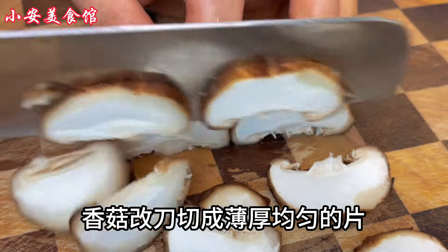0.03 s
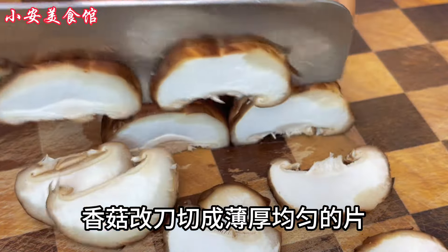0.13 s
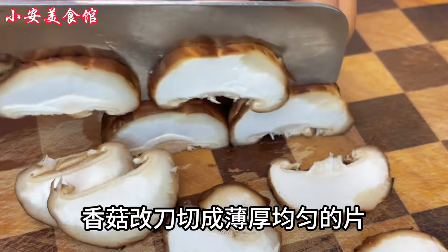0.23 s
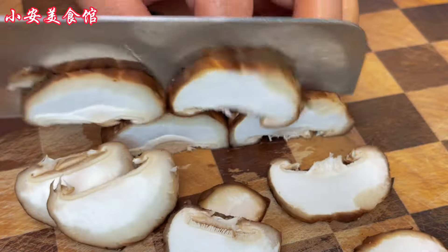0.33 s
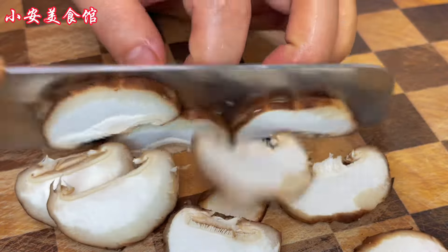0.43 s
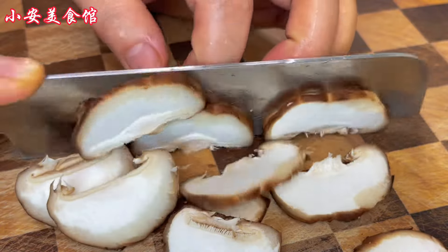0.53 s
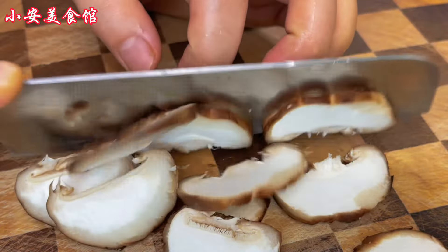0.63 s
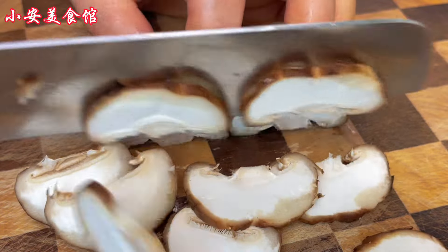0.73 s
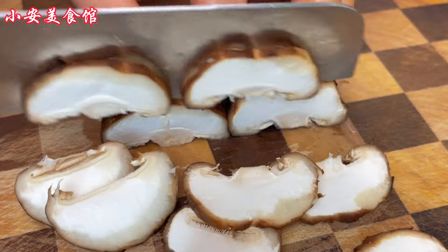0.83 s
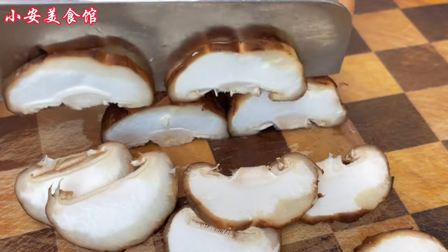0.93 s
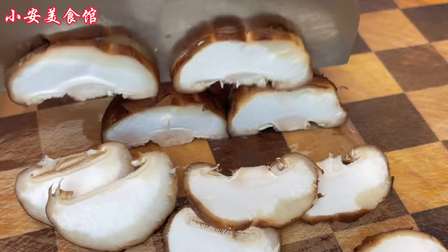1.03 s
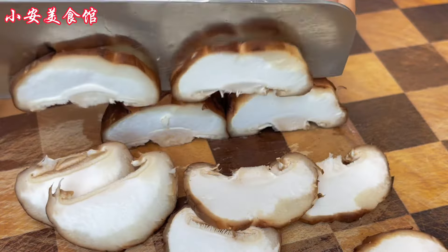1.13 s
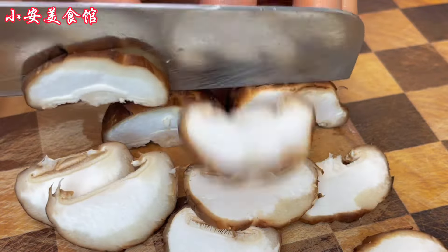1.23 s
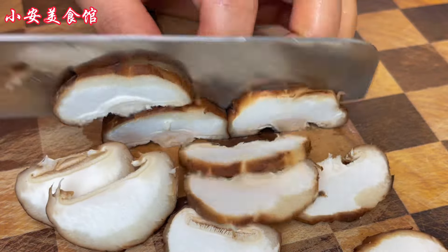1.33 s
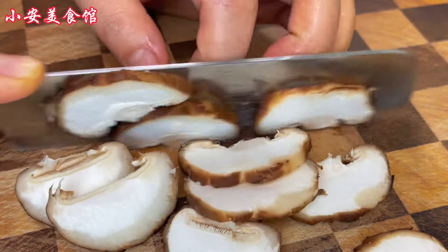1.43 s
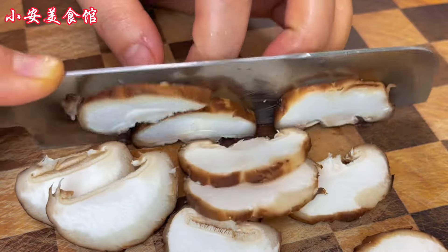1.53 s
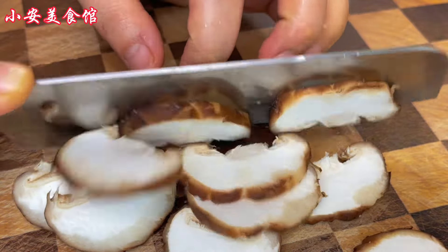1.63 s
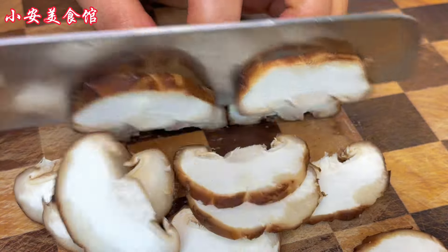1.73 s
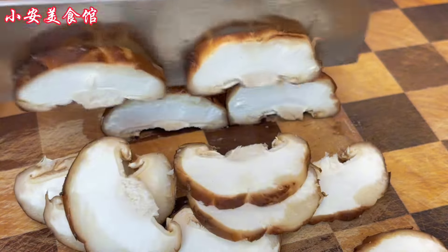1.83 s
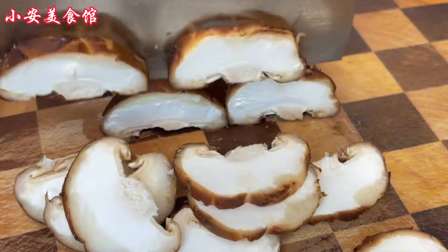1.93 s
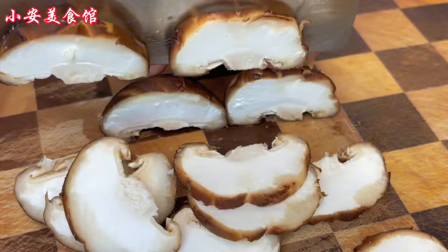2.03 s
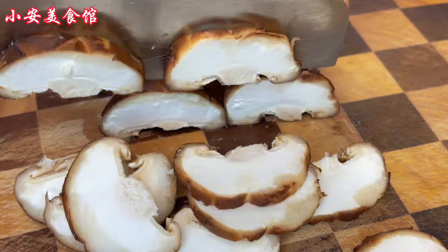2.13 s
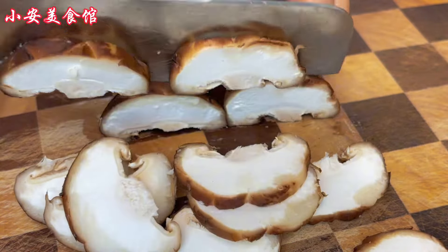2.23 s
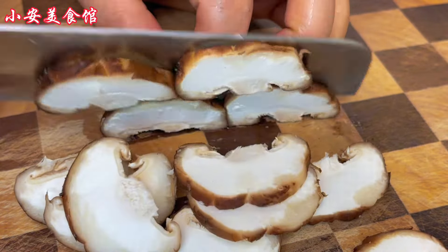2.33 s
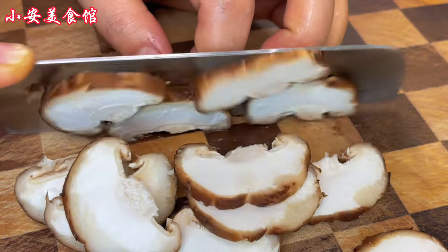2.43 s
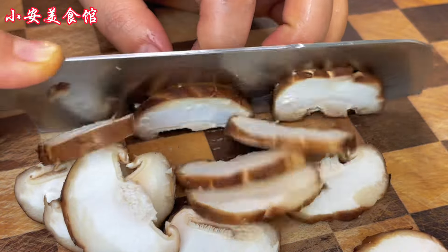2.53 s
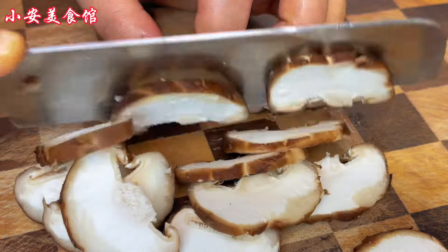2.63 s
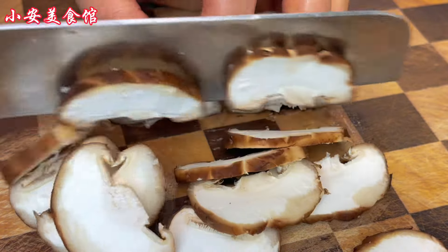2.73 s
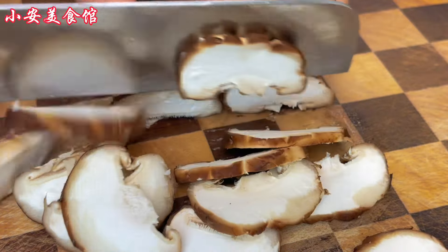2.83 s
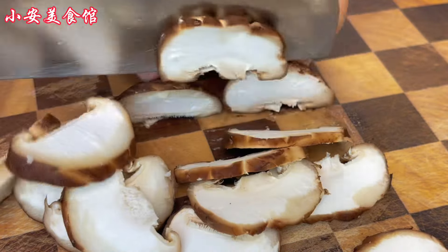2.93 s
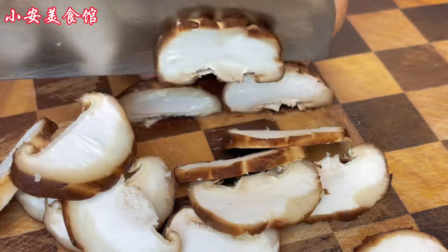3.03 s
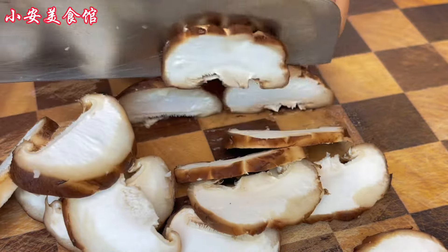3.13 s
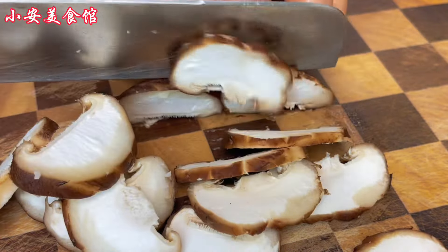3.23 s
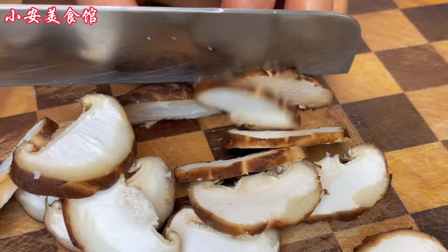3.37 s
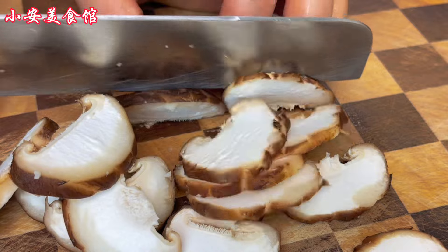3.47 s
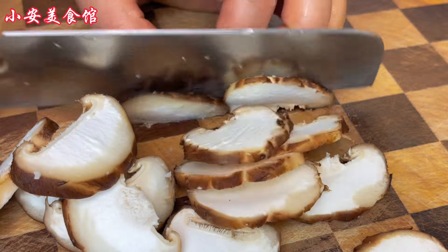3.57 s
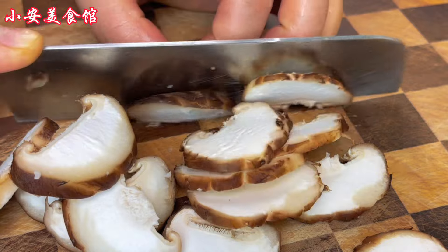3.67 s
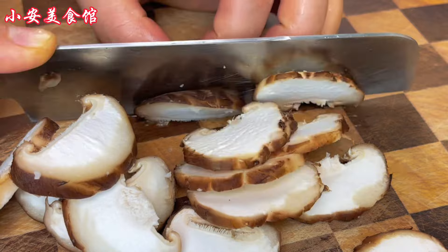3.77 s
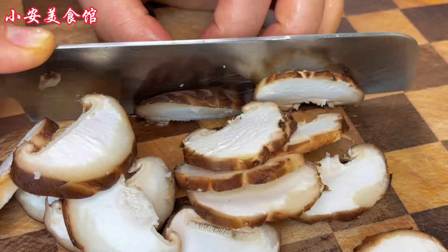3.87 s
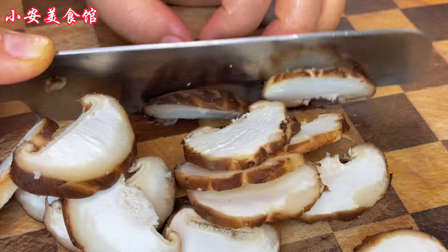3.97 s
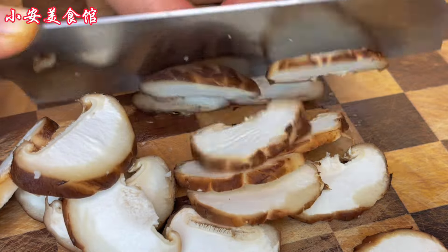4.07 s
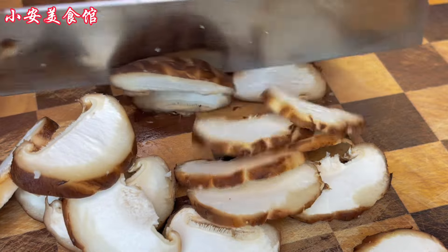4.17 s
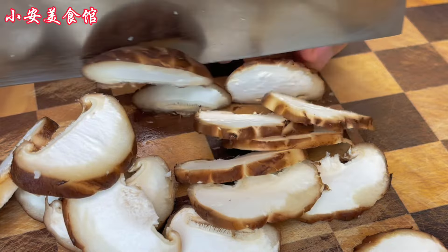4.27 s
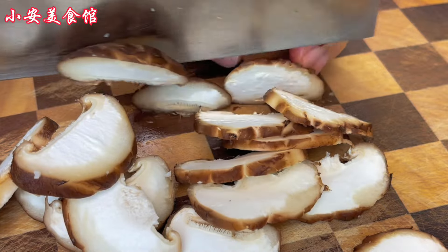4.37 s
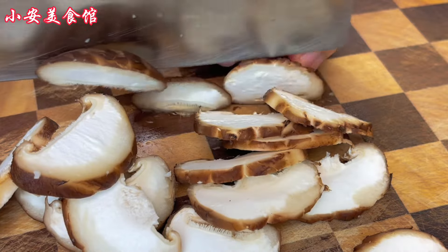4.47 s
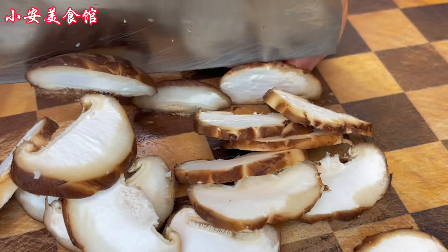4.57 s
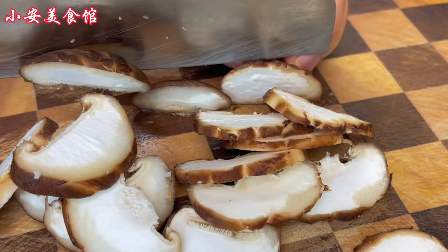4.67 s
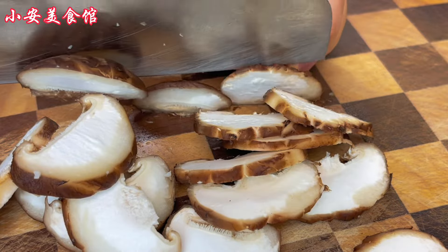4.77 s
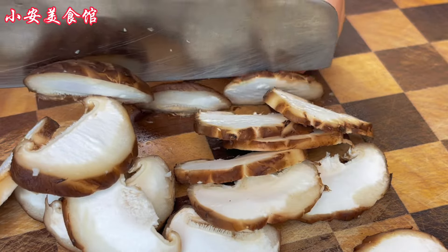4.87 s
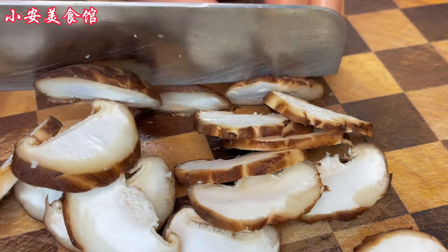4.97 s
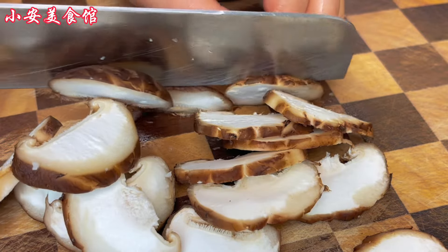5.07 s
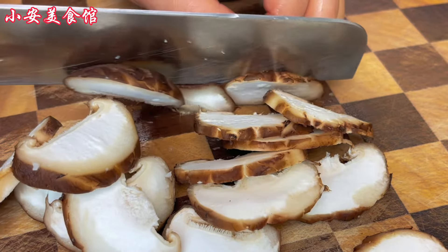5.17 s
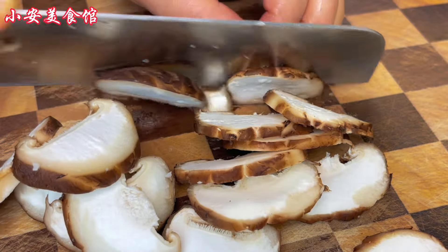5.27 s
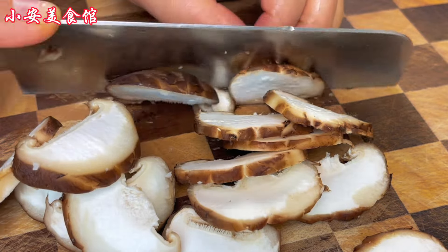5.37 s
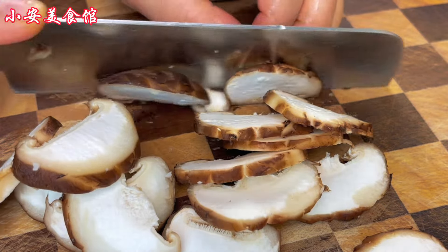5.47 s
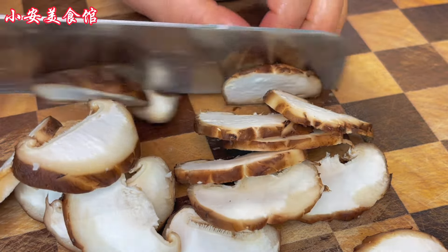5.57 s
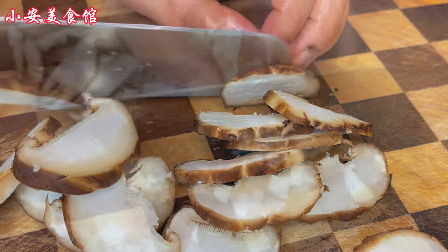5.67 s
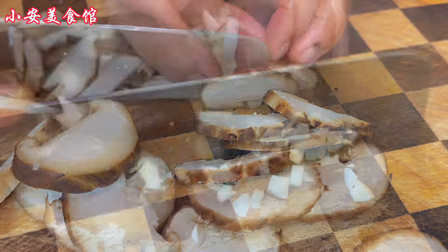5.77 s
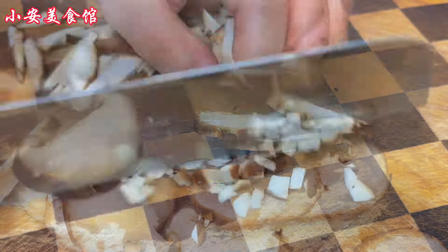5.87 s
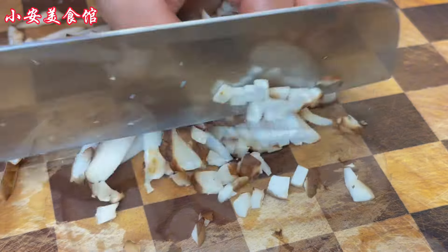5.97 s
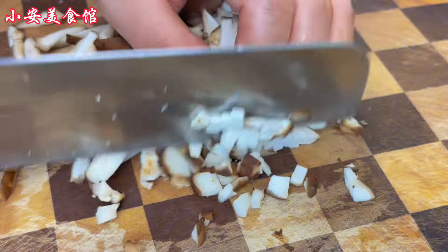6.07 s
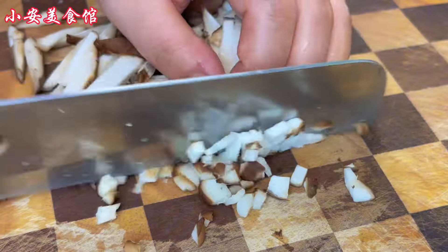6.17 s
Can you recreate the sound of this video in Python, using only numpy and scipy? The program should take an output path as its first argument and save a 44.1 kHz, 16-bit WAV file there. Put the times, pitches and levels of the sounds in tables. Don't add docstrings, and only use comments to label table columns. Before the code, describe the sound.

In a small home kitchen, heard very close, a cleaver slices mushrooms on a thick wooden board. Each stroke crunches through damp flesh and ends in a loud, short woody knock, then a wet drag. Slices pat down softly between strokes, the blade ticks and briefly rings, the counter thuds low, and a fan blows steadily underneath.

```python
import sys
import numpy as np
from scipy import signal
from scipy.fft import rfft, irfft, next_fast_len
from scipy.io import wavfile
from scipy.ndimage import uniform_filter1d

SR = 44100
rng = np.random.default_rng(int(sys.argv[2]) if len(sys.argv) > 2 else 0)


def attenuation_scalar(level_db):
    decades = np.asarray(level_db, float) / 20
    return 10 ** decades


def file_out(sig):
    cols = np.atleast_2d(sig).T
    lim = np.clip(cols, -1, 1)
    pcm = np.round(lim * 32767).astype(np.int16)
    wavfile.write(sys.argv[1], SR, pcm)


N = 273420

# start_s, peak_db, low_modes_db, high_modes_db, clap_hz
LANDINGS = [(.001, -18.5, -3, 2, 894), (.0222, -16, -12.5, -3.5, 900), (.471, -10, 2, -15, 554),
            (0.4757, 1.5, -3.5, -6, 692), (0.644, -31, 9, -3, 443), (1.037, -32, 7, 9, 345),
            (1.431, -3.5, -12, -16, 470), (1.435, -1, -4, 25, 700), (2.419, -9, -22, 9, 450),
            (2.4265, 0.5, 4.5, 7.5, 582), (3.631, -6, 4, -18, 500), (3.638, -2, 0.5, 0, 600),
            (3.68, -17, -19, 2, 453), (3.963, -31, -12, -2, 400), (5.339, -13.5, -9, -33, 487),
            (5.3463, 0.5, -2.5, -15.5, 619), (5.612, -18, -4, -9, 860), (5.623, 0.5, 9, 3.5, 560),
            (5.802, -18.5, 12, -11, 376), (6.138, -13, 10, -10, 500), (6.161, 1, 3.5, -8, 604),
            (1.459, -19, -5, 7, 500), (2.436, -17, -9, -8, 360), (5.387, -43, 5, -1, 450),
            (5.665, -21, 10, -5, 437), (5.674, -31, 0, -5, 420), (5.689, -24, 4, -8, 460),
            (1.4321, -7, 8, -14, 413), (5.3502, -6, 6, -13, 450), (5.3565, -12, 4, -7, 533),
            (1.4507, -21, -2, -6, 406), (3.6423, 1, -17, -4, 485), (3.6335, -5, -5, -14, 513),
            (5.751, -16, 4, -16, 386), (5.757, -28, -12, 2, 360), (5.632, -13.5, -2.5, -9, 380),
            (2.468, -22, -7, -5, 420), (5.362, -15, -5, -13, 370), (5.384, -21, -4, -9, 450),
            (2.448, -21.5, -6, -12, 350)]
# mode_hz, level_db, t60_s
BLADE_MODES = [(1846, -9, 0.22), (2200, -14, .25), (2900, -4.5, 0.17), (3460, -5, 0.18),
               (3626, -12.5, 0.35), (4750, -3, 0.11), (5700, -3, 0.079), (5850, -11, 0.19),
               (6620, -20, 0.071), (7240, -5, .1), (7830, -4.5, 0.1), (8770, -5, 0.28), (9660, -6, .07),
               (10520, -3, .12), (12160, 7, .1)]
SWAY_HZ = 46.4


def rms_one(x):
    return x / np.sqrt(np.mean(x ** 2) + 1e-20)


def at_hz(points, hz):
    points = np.array(points)
    return np.interp(np.log(hz), np.log(points[:, 0]), points[:, 1])


def band(x, order, hz, kind="low"):
    return signal.sosfilt(signal.butter(order, hz, kind, fs=SR, output="sos"), x)


def drift(rate_hz):
    r = np.exp(-80 * np.pi * rate_hz / SR)
    slow = signal.lfilter([1], [1, -2 * r, r * r], rng.standard_normal(N // 40 + 2002))[2000:]
    return np.interp(np.arange(N) / 40, np.arange(len(slow)), rms_one(slow))


def ring(drive, hz, t60_s):
    r = attenuation_scalar(-60 / (t60_s * SR))
    w = 2 * np.pi * hz / SR
    return signal.lfilter([0, np.sin(w)], [1, -2 * r * np.cos(w), r * r], drive + 1e-18)


def ring_s(width_hz):
    return np.log(1000) / np.pi / width_hz


def colour(x, spectrum):
    hz = np.maximum(np.fft.rfftfreq(N, 1 / SR), 1)
    ends = [(spectrum[0][0] / 2, -90)] + list(spectrum) + [(spectrum[-1][0] * 2, -120)]
    return rms_one(irfft(rfft(x) * attenuation_scalar(at_hz(ends, hz)), N))


def grains(per_s, spread_db):
    sizes = attenuation_scalar(spread_db * np.minimum(rng.exponential(1, N), 4)) * rng.choice([-1, 1], N)
    return sizes * (rng.random(N) < per_s / SR)


def streaky(x, depth_db):
    cells = signal.stft(x, nperseg=512)[2]
    field = rng.standard_normal(cells.shape)
    for _ in range(2):
        field = uniform_filter1d(field, size=3, axis=0)
        field = uniform_filter1d(field, size=6, axis=1)
    return rms_one(signal.istft(cells * attenuation_scalar(depth_db * rms_one(field)), nperseg=512)[1][:N])


def swell(start_s, end_s, start_db, end_db, rise_s, fall_s):
    t = np.arange(N) / SR
    done = np.clip((t - start_s) / max(end_s - start_s, 1e-4), 0, 1)
    outside = np.maximum(start_s - t, 0) / rise_s + np.maximum(t - end_s, 0) / fall_s
    return attenuation_scalar(start_db + (end_db - start_db) * done - 30 * outside)


def hump(s, half_s, level_db):
    return attenuation_scalar(level_db) * np.exp(-((np.arange(N) / SR - s) / half_s) ** 2)


def add(track, s, sound):
    i = round(s * SR)
    track[i:i + len(sound)] += sound[:N - i]


def fan(patchy_db):
    # freq_hz, level_db_per_hz
    air = [(30, -29), (60, -6), (95, 9), (192, 0), (406, -5.5), (724, -11), (1400, -16), (1900, -14),
           (2480, -70), (3650, -83), (6050, -32.5), (9300, -68), (13000, -34.5)]
    # mode_hz, width_hz, level_db
    duct_modes = [(110, 25, -75), (249.7, 8.1, -43), (560, 29, -53.5), (1015, 67, -52), (1110, 17, -61),
                  (1836, 35, -61.5)]
    # time_s, level_db
    loudness = [(0.0, -46), (1.31, -41), (1.48, -30.5), (1.64, -41.5), (2.19, -41), (2.45, -41.5),
                (3.45, -44), (3.76, -40), (4.52, -43.5), (4.73, -45), (5.33, -51), (5.53, -40.5),
                (6.2, -39)]
    # freq_hz, likeness (1 = same)
    likeness = [(60, 0.97), (250, 0.92), (560, 0.69), (1000, 0.14), (1500, 0.27), (2000, 0.31)]
    out = 0
    edges_hz = 30 * 2 ** np.arange(0, 9.1, .5)
    white = rng.standard_normal((2, 2, N))
    for k, (low_hz, high_hz) in enumerate(zip(edges_hz, edges_hz[1:])):
        mid, side = band(white[k % 2], 2, [low_hz, high_hz], "band")
        hz = np.sqrt(low_hz * high_hz)
        alike = at_hz(likeness, hz)
        gain = attenuation_scalar(at_hz(air, hz) + patchy_db * drift(15.5))
        out = out + gain * (np.sqrt(1 + alike) * mid + np.sqrt(1 - alike) * side * [[1], [-1]])
    duct = white[0] + 2.13 * white[1, 0]
    tones = 0
    for hz, width_hz, tone_db in duct_modes:
        tones = tones + attenuation_scalar(tone_db + 41 + 1.53 * drift(9.2)) * rms_one(ring(duct, hz, ring_s(width_hz)))
    time_s, level_db = np.transpose(loudness)
    level = attenuation_scalar(np.interp(np.arange(N) / SR, time_s, level_db))
    return level * (attenuation_scalar(5.0) * rms_one(out) + tones)


def cutting():
    # freq_hz, level_db_per_hz
    flesh_spectrum = [(290, -53), (500, -34), (587, -7), (780, -14), (1170, -4.5), (1480, -4), (1680, -4),
                      (2920, -2.5), (4200, -33), (5460, -69), (9240, -120)]
    # freq_hz, level_db_per_hz
    rub_spectrum = [(3000, -1.5), (3600, -8), (4040, -10.5), (4510, -6), (7670, -10), (8640, -7),
                    (9300, -8), (12400, -15.5), (16000, -8)]
    # start_s, lift_s, start_db, lift_db, rub_over_crunch_db
    drags = [(0, 0.19, -30.5, -56.5, -2.5), (0.492, 0.55, -36, -36.5, -5), (1.453, 1.516, -42.5, -37, -2),
             (2.428, 2.541, -34, -33, -4), (2.594, 2.846, -53, -80, 5), (3.666, 3.766, -40, -39.5, -10.5),
             (5.347, 5.42, -37, -47.5, -3), (5.652, 5.767, -31, -35.5, -2.5),
             (5.79, 6.05, -44.5, -55.5, -7), (6.153, 6.201, -46, -32, 3)]
    # bite_s, landing_s, bite_crunch_db, landing_crunch_db, rub_over_crunch_db
    pushes = [(0.276, 0.445, -57.5, -27.5, -1), (1.338, 1.415, -32, -27.5, -3.5),
              (1.298, 1.33, -39.5, -47.5, 0), (2.296, 2.4, -41, -31, 0), (3.218, 3.582, -58.5, -41, 0.5),
              (3.603, 3.622, -41.5, -28, -2.5), (5.015, 5.124, -50.5, -49.5, -1),
              (5.132, 5.351, -55.5, -38.5, 0), (5.481, 5.628, -52.5, -29.5, 0.5),
              (6.069, 6.117, -63.5, -59, 13)]
    # landing_s, crunch_db, rub_over_crunch_db
    bursts = [(0.468, -21, -10.5), (1.427, -21, -7), (2.418, -24, -2), (3.633, -21, -30),
              (5.618, -35.5, 7.5), (6.146, -26.5, -0.5)]
    # start_s, crunch_db, rub_over_crunch_db
    brushes = [(0.648, -46, -0.5), (.836, -47.5, -22.5), (0.929, -48, -10), (1.043, -50, -0.5),
               (1.16, -69.5, 20), (1.613, -42.5, -2.5), (1.885, -54, -17.5), (1.992, -54, 11),
               (2.123, -52.5, -3), (2.963, -60.5, 9), (3.98, -37.5, -5.5)]
    bite_s, lift_s, burst_rise_s, burst_fall_s, brush_rise_s, brush_fall_s = 0.021, 0.045, 0.022, 0.049, 0.034, 0.089
    rest_crunch_db, rest_rub_db = -60.5, -65
    moves = [(swell(*run, bite_s, burst_fall_s), wet_db) for *run, wet_db in pushes]
    moves += [(swell(s, s, db, db, burst_rise_s, burst_fall_s), wet_db) for s, db, wet_db in bursts]
    moves += [(swell(*run, bite_s, lift_s), wet_db) for *run, wet_db in drags]
    moves += [(swell(s, s, db, db, brush_rise_s, brush_fall_s), wet_db) for s, db, wet_db in brushes]
    flesh = np.sqrt(attenuation_scalar(rest_crunch_db) ** 2 + sum(gain ** 2 for gain, _ in moves))
    steel = np.sqrt(attenuation_scalar(rest_rub_db) ** 2 + sum((gain * attenuation_scalar(wet_db)) ** 2 for gain, wet_db in moves))
    cells = grains(4000, spread_db=3.5) * attenuation_scalar(1.5 * drift(60))
    crunch = streaky(colour(cells, flesh_spectrum), depth_db=1.6)
    slips = grains(9000, spread_db=1.5) * attenuation_scalar(1.1 * drift(56))
    rub = streaky(colour(slips, rub_spectrum), depth_db=1.7)
    return flesh * crunch + steel * rub


def squeaks():
    # start_s, end_s, pitch_hz, start_db, end_db
    held = [(0, 0.18, 183, -28.5, -34.5), (0, .07, 870, -24.5, -40), (0, 0.055, 2300, -33, -42),
            (.07, 0.18, 2240, -37.5, -50), (0, .15, 2700, -41, -47), (0, .13, 7620, -40.5, -50.5),
            (1.41, 1.425, 1320, -28, -20), (2.465, 2.54, 2400, -44, -38), (3.692, 3.92, 444, -27.5, -41),
            (3.66, 3.82, 1800, -35, -48), (5.655, 5.74, 383, -23, -29), (5.5, 5.61, 1930, -43, -37.5),
            (1.037, 1.062, 350, -22, -33.5), (4.2, 4.63, 561, -49.5, -44), (4.25, 4.7, 1030, -49, -52.5),
            (2.75, 3.0, 524, -46, -49)]
    out = np.zeros(N)
    noise = rng.standard_normal((len(held), SR // 2))
    for (start_s, end_s, hz, start_db, end_db), hiss in zip(held, noise):
        length = round((end_s - start_s) * SR)
        t60_s = ring_s(28 + .07 * hz)
        tone = rms_one(ring(ring(hiss, hz, t60_s), hz, t60_s / 2)[-length:])
        fade = attenuation_scalar(np.linspace(start_db, end_db, length)) * signal.windows.tukey(length, .2)
        add(out, start_s, tone * fade)
    return out


def counter():
    # start_s, half_length_s, sway_db
    leans = [(0.546, 0.018, -15), (0.61, 0.039, -12), (0.717, .03, -28.5), (0.857, 0.033, -46),
             (1.236, 0.048, -33.5), (1.394, 0.024, -23.5), (1.574, 0.053, -18), (1.688, 0.012, -26.5),
             (2.192, 0.041, -38), (2.383, 0.068, -31), (2.554, 0.041, -12.5), (2.66, 0.06, -30),
             (3.055, 0.076, -37.5), (3.65, 0.14, -37), (3.825, 0.037, -20.5), (4.7, 0.032, -45),
             (5.413, 0.034, -34), (5.61, 0.032, -23), (5.676, 0.018, -20), (5.72, 0.018, -24),
             (5.798, 0.046, -7.5), (6.2, 0.041, -12)]
    # start_s, level_db
    thuds = [(0, -19.5), (.66, -28), (1.12, -40), (1.311, -25), (1.52, -37.5), (2.38, -30.5), (2.64, -40.5),
             (5.86, -27.5), (5.999, -29.5)]
    rest_sway_db, rest_thud_db, lean_thud_db, thud_half_s = -52.5, -49.5, -14.5, 0.053
    lean = attenuation_scalar(rest_sway_db + 5.2 * drift(4.6)) + sum(hump(*row) for row in leans)
    thud = attenuation_scalar(rest_thud_db) + attenuation_scalar(lean_thud_db) * lean + sum(hump(s, thud_half_s, db) for s, db in thuds)
    sway = np.sqrt(2) * np.sin(2 * np.pi * np.cumsum(SWAY_HZ * (1 + .03 * drift(4))) / SR)
    lumps = band(rng.standard_normal(N), 2, [70, 230], "band")
    return lean * sway + thud * attenuation_scalar(-2.0) * rms_one(lumps * attenuation_scalar(2 * drift(21.0)))


def board():
    # mode_hz, level_db, t60_s
    board_modes = [(345.7, -2, 0.16), (376, 1, 0.15), (436, 2.5, 0.03), (450, -11, 0.2), (500, -2, 0.083),
                   (547.4, -2.5, 0.064), (640, 2, 0.015), (751, 8, 0.031), (864, 1.5, 0.022),
                   (1106, 6, 0.021), (1550, -11, 0.035), (1900, -34, .04), (2300, -38, .04)]
    contact_s = 0.00016
    out = np.zeros(N)
    t = np.arange(SR // 3) / SR
    push = t * np.exp(-t / contact_s)
    scatter = rng.standard_normal((len(LANDINGS), len(board_modes)))
    for (s, peak_db, low_db, high_db, clap_hz), luck in zip(LANDINGS, scatter):
        clap = ring(ring(push, clap_hz, 0.011), clap_hz, 0.011)
        body = 0
        for k, ((hz, mode_db, t60_s), chance) in enumerate(zip(board_modes, luck)):
            tip_db = np.interp(hz, [400, 600, 900], [low_db, 0, high_db])
            swing = attenuation_scalar(3 * chance) * (-1) ** k
            body = body + swing * attenuation_scalar(mode_db + tip_db) * ring(push, hz * (1 + 0.0159 * chance), t60_s)
        knock = body / np.abs(body).max() + attenuation_scalar(2.0) * clap / np.abs(clap).max()
        knock = band(knock, 4, 280, "high")
        add(out, s, attenuation_scalar(peak_db) * knock / np.abs(knock).max())
    return out


def worktop():
    note_hz, t60_s, level_db = 170.7, 0.088, -17.5
    clicks = np.zeros(N)
    for s, peak_db, *_ in LANDINGS:
        clicks[round(s * SR)] = attenuation_scalar(peak_db + level_db)
    soft = band(clicks + 1e-18, 2, 400)
    return ring(soft, note_hz, t60_s) + 0.14 * ring(soft, 1.25 * note_hz, t60_s)


def snaps():
    # start_s, peak_db, pitch_hz, t60_s, brightness_db
    bites = [(0.0222, -1.5, 2300, 0.0074, -22), (0.4597, -1.5, 2000, 0.014, -21),
             (.469, -4.5, 1900, 0.036, -8), (0.4774, 4, 1070, 0.026, -16.5), (1.421, -9.5, 1500, 0.05, -10),
             (1.4316, 2, 2540, 0.017, -12), (1.435, 6.5, 1230, 0.012, -7.5),
             (2.4162, -8.5, 2720, 0.026, -7), (2.427, 3, 3260, 0.0069, -0.5), (3.607, -22, 2250, 0.053, 3),
             (3.631, -7, 1490, 0.023, 4), (3.639, 7, 1550, 0.015, -15), (5.346, -12, 1550, 0.017, -12),
             (5.611, -4, 2050, 0.004, -1), (5.8014, -9, 1285, 0.033, -9.5), (6.139, -2, 1250, 0.01, -3)]
    # start_s, peak_db, pitch_hz, brightness_db
    pats = [(.181, -22.5, 2300, -8), (.197, -26, 1510, -12), (.643, -25.5, 1940, 4),
            (0.832, -15.5, 1330, -21), (0.858, -22.5, 2020, -18), (1.035, -16.5, 1190, -15),
            (1.2908, -15, 1160, -4.5), (1.582, -19.5, 1280, -7), (1.612, -35, 1220, -13),
            (1.977, -16.5, 1320, -14.5), (2.296, -23, 2050, 6), (2.709, -22, 1550, -6.5),
            (3.966, -25.5, 2300, -7.5), (4.0801, -13.5, 1160, -44), (5.099, -36.5, 2760, 9.5),
            (5.6688, -15, 2620, 1.5), (1.2349, -54, 1110, -8), (1.895, -53, 3000, 13),
            (5.74, -14, 980, -18), (2.9574, -25.5, 4860, 13), (0.75, -44, 2900, 4),
            (.7712, -28.5, 2950, -14), (.898, -41.5, 3000, 5), (5.723, -20, 1570, 0.5),
            (5.764, -30, 1250, -14), (0.15, -36, 2400, -12)]
    pat_t60_s = 0.0093
    out = np.zeros(N)
    t = np.arange(2048) / SR
    rows = [*bites, *((s, db, hz, pat_t60_s, bright_db) for s, db, hz, bright_db in pats)]
    noise = rng.standard_normal((len(rows), 2, len(t)))
    for (s, peak_db, hz, t60_s, bright_db), (dull, sharp) in zip(rows, noise):
        fade = attenuation_scalar(-60 * t / np.clip(t60_s, .004, .05)) * (1 - np.exp(-t / 0.0003))
        body = ring(dull * fade, hz, 0.0047)
        crack = band(sharp * fade, 2, [3200, 14000], "band")
        snap = body / np.abs(body).max() + attenuation_scalar(bright_db) * crack / np.abs(crack).max()
        add(out, s, attenuation_scalar(peak_db - 6.5) * snap)
    return out


def glides():
    # start_s, end_s, from_hz, to_hz, level_db
    slurs = [(0.42, .45, 2100, 2900, -42), (.38, .45, 1400, 1700, -44), (1.36, 1.42, 1300, 1900, -40),
             (0.31, .45, 7600, 9400, -50), (1.33, 1.39, 1400, 2100, -38), (1.38, 1.43, 2300, 2500, -31.5),
             (1.335, 1.42, 8900, 8500, -40), (1.47, 1.525, 6500, 4900, -45), (1.475, 1.52, 6200, 9100, -62),
             (1.49, 1.525, 3600, 3500, -40.5), (2.345, 2.4, 2900, 3000, -35.5),
             (2.35, 2.4, 2600, 1400, -34.5), (2.3, 2.36, 7500, 12000, -50), (2.475, 2.535, 4900, 6400, -41),
             (3.655, 3.79, 620, 560, -31.5), (3.66, 3.79, 1020, 910, -41), (4.475, 4.52, 2460, 2100, -53.5),
             (4.755, 4.785, 3430, 2400, -58), (5.53, 5.605, 7000, 7050, -45.5),
             (5.53, 5.6, 3900, 5200, -50), (5.66, 5.7, 2700, 2000, -43), (5.65, 5.7, 12000, 5900, -43),
             (5.69, 5.75, 6000, 6400, -46), (5.7, 5.765, 5500, 2700, -35.5),
             (5.17, 5.345, 2700, 2900, -48.5), (5.01, 5.13, 2000, 6000, -61), (5.72, 5.75, 7400, 4700, -42),
             (5.715, 5.75, 1400, 1200, -34)]
    out = np.zeros(N)
    noise = rng.standard_normal((len(slurs), 2, SR // 4))
    for (start_s, end_s, from_hz, to_hz, level_db), hiss in zip(slurs, noise):
        length = round((end_s - start_s) * SR)
        width_hz = 80 + .05 * from_hz
        a, b = band(hiss, 2, width_hz / 2)[:, -length:]
        turn = 2 * np.pi * np.cumsum(np.linspace(from_hz, to_hz, length)) / SR
        tone = rms_one(a * np.cos(turn) + b * np.sin(turn))
        add(out, start_s, attenuation_scalar(level_db) * tone * signal.windows.tukey(length, .5))
    return out


def blade_taps():
    # start_s, peak_db, freedom_to_ring (0-1), top_modes_db
    taps = [
        (0.9868, -30, 0, -2),
        (1.987, -17.5, 0.22, -18.5),
        (2.0124, -46, 0.5, -3),
        (2.4544, -33, 0.6, -8),
        (2.9572, -12.5, 0.35, 0),
    ]
    out = np.zeros(N)
    t = np.arange(SR // 4) / SR
    scatter_db = rng.standard_normal((len(taps), len(BLADE_MODES)))
    chatter = rng.standard_normal((len(taps), len(t))) * .15 * np.exp(-t / .0007) + (t == 0)
    for (s, peak_db, free, top_db), luck_db, click in zip(taps, scatter_db, chatter):
        tap = 0
        for (hz, mode_db, t60_s), chance_db in zip(BLADE_MODES, luck_db):
            gain = attenuation_scalar(mode_db + chance_db + top_db * (hz > 10000))
            tap = tap + gain * ring(click, hz, max(free, .1) * t60_s)
        add(out, s, attenuation_scalar(peak_db) * tap / np.abs(tap).max())
    return out


def sliding():
    # start_s, end_s, level_db
    slides = [(1.03, 1.079, -49), (1.132, 1.17, -48.5), (2.005, 2.023, -43.5), (2.093, 2.117, -49.5),
              (2.962, 2.997, -52), (3.23, 3.274, -52.5), (3.394, 3.592, -50), (3.938, 4.051, -56),
              (5.517, 5.588, -41.5), (5.837, 5.946, -57)]
    t = np.arange(N) / SR
    pressure = 0
    for start_s, end_s, level_db in slides:
        corners_s = [start_s, start_s + 0.0047, end_s, end_s + 0.024]
        pressure = pressure + attenuation_scalar(level_db) * np.interp(t, corners_s, [0, 1, 1, 0])
    friction = grains(6000, spread_db=3) * attenuation_scalar(1.5 * drift(40))
    steel = sum(attenuation_scalar(mode_db) * ring(friction, hz, 0.28 * t60_s) for hz, mode_db, t60_s in BLADE_MODES[:-2])
    return pressure * rms_one(steel)


def set_down():
    start_s, level_db, above_sway_hz, glide_s = 5.738, -9.5, 136, 0.027
    out = np.zeros(N)
    t = np.arange(SR // 5) / SR
    hz = SWAY_HZ + above_sway_hz * np.exp(-t / glide_s)
    fade = (1 - np.exp(-t / 0.0052)) * np.exp(-t / 0.053)
    add(out, start_s, attenuation_scalar(level_db) * np.sin(2 * np.pi * np.cumsum(hz) / SR) * fade)
    return out


def kitchen(x):
    t60_s, wall_cut_hz = .5, 3300
    out = np.zeros((2, N))
    dull = np.exp(-2 * np.pi * wall_cut_hz / SR)
    lags = (rng.uniform(.012, .035, size=16) * SR).astype(int)
    for k, lag in enumerate(lags):
        loop, state = x.copy(), [0.]
        gain = attenuation_scalar(-60 * lag / SR / t60_s)
        for i in range(lag, N, lag):
            back, state = signal.lfilter([gain * (1 - dull)], [1, -dull], loop[i - lag:i], zi=state)
            loop[i:i + lag] += back[:N - i]
        out[k % 2] += (loop - x) * (-1) ** (k // 2)
    return out


def ports(x):
    # freq_hz, left_lead_rad, left_minus_right_db
    port_pair = [(40, -.55, -.3), (300, -.35, .5), (600, -.35, -1), (900, .1, -3), (1500, -.2, -1),
                 (2100, .1, .5), (2600, .1, 0), (3300, .15, 0), (5200, .08, 0), (7400, .08, 0),
                 (7750, .6, 0), (8300, .2, 0), (8790, -.3, -.5), (9300, -1.6, 0), (9820, -2.5, 0),
                 (10340, -3.15, 0), (10850, -4.1, 0), (11370, -5.3, 0), (11890, -6.25, 0), (12400, -6.4, 0),
                 (13400, -7.2, 0), (16000, -7.2, 0)]
    # freq_hz, level_db
    response = [(40, -5.5), (300, -3), (560, 0.5), (945, 1.5), (1550, -2), (2070, -1), (3340, -3.5),
                (7200, 3), (8660, 0.5), (9740, -0.5), (10400, -2.5), (11400, -11.5), (12300, -17),
                (12900, -42.5), (14500, -36), (16000, -33)]
    size = next_fast_len(N + SR // 4)
    hz = np.maximum(np.fft.rfftfreq(size, 1 / SR), 1)
    lead_rad, tilt_db = (at_hz(np.array(port_pair)[:, [0, k]], hz) for k in (1, 2))
    half = attenuation_scalar(tilt_db / 2) * np.exp(.5j * lead_rad)
    return irfft(rfft(x, size) * attenuation_scalar(at_hz(response, hz)) * np.stack([half, 1 / half]), size)[:, :N]


def scene():
    kitchen_db, wide_below_hz, blow_side_db, blow_side_hz = -21.5, 1820, -21, 1800
    blows = board() + snaps()
    near = blows + blade_taps() + cutting() + sliding() + squeaks() + glides()
    left, right = attenuation_scalar(kitchen_db) * kitchen(near) + fan(patchy_db=3.0)
    side = band(left - right, 6, wide_below_hz) / 2
    side = side + attenuation_scalar(blow_side_db) * band(blows, 2, blow_side_hz, "high")
    middle = near + counter() + worktop() + set_down() + (left + right) / 2
    return ports(middle + side * np.array([[1], [-1]]))


def roll_off(x):
    return signal.sosfilt(signal.butter(12, 16300, fs=SR, output="sos"), x)


def record(dry):
    squeezed = dry / (1 + np.abs(dry) ** 8) ** (1 / 8)
    return roll_off(squeezed)


dry = scene()
out = record(dry)
file_out(out)
```